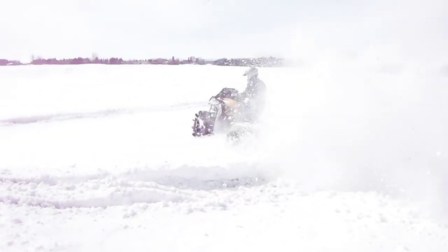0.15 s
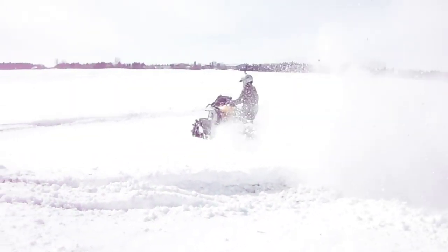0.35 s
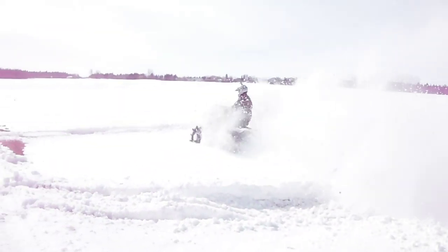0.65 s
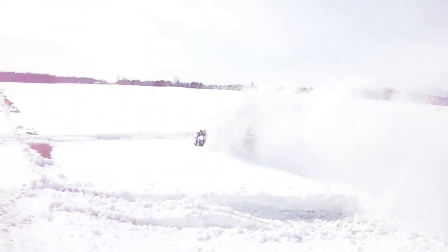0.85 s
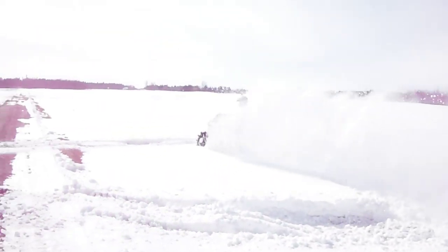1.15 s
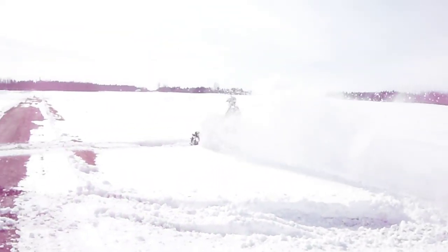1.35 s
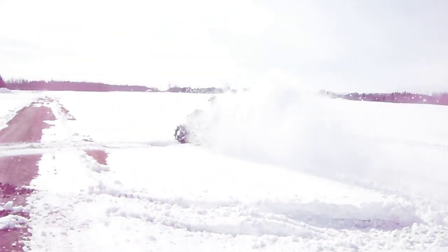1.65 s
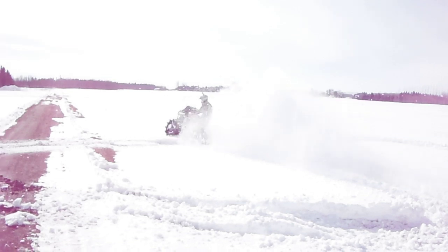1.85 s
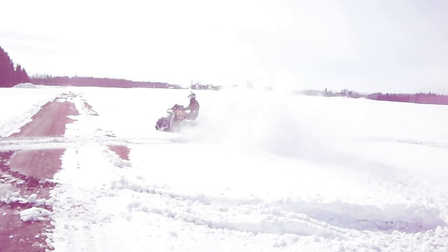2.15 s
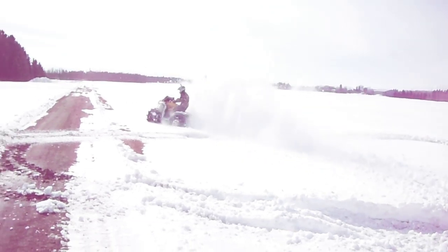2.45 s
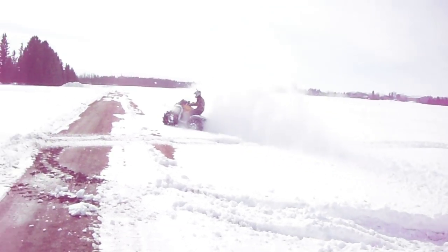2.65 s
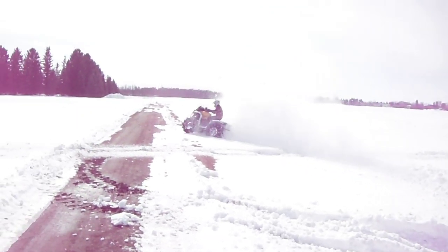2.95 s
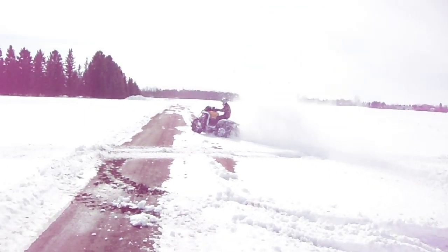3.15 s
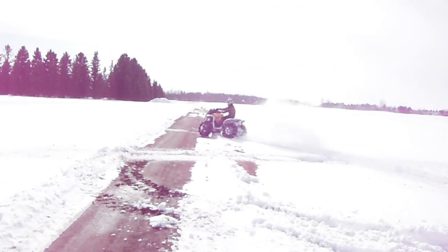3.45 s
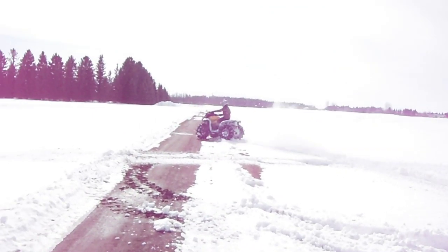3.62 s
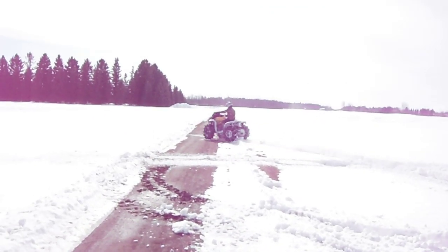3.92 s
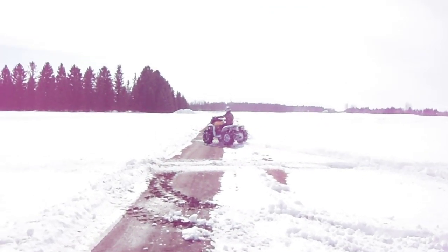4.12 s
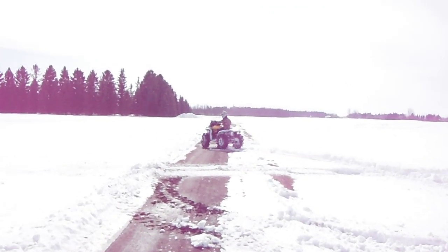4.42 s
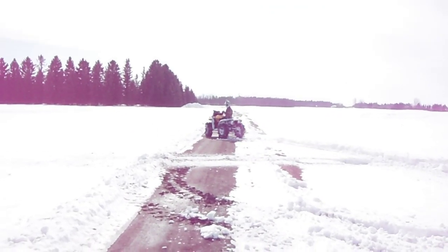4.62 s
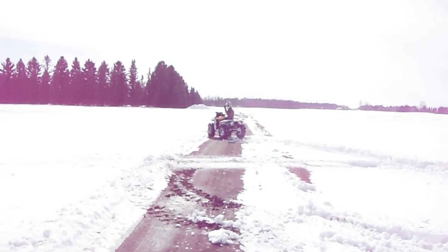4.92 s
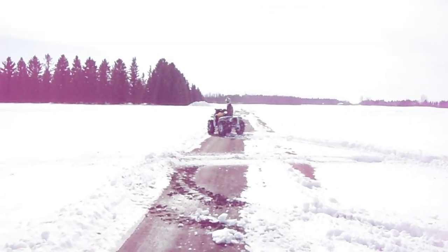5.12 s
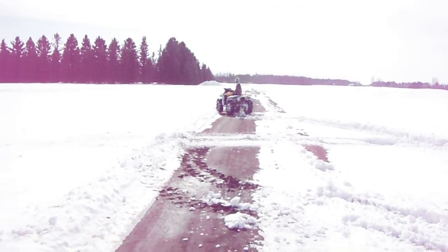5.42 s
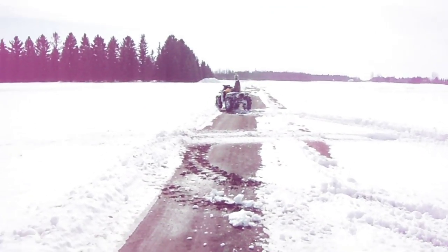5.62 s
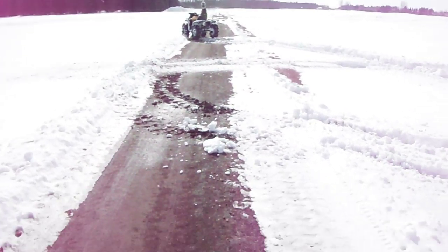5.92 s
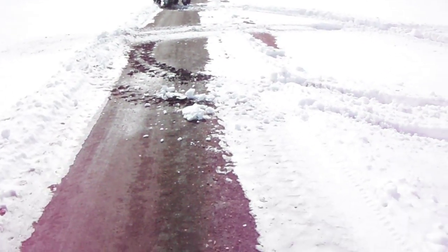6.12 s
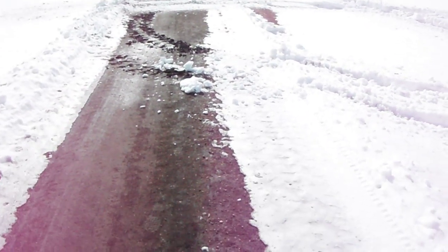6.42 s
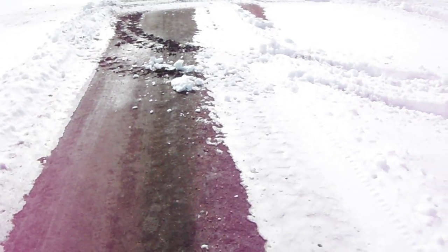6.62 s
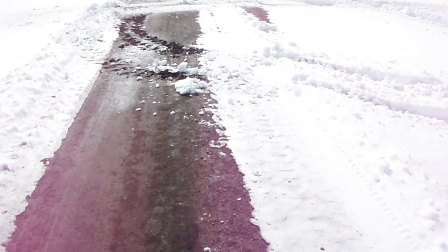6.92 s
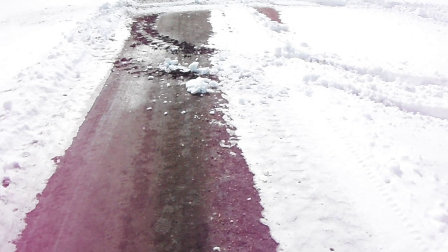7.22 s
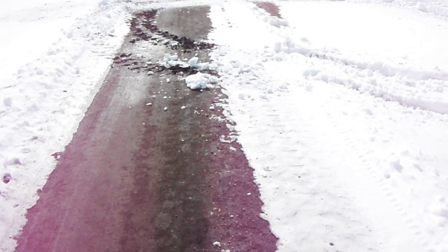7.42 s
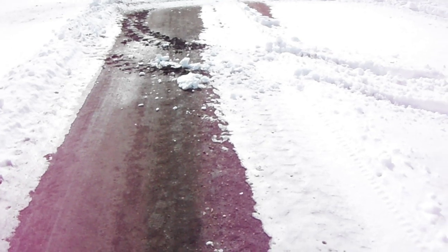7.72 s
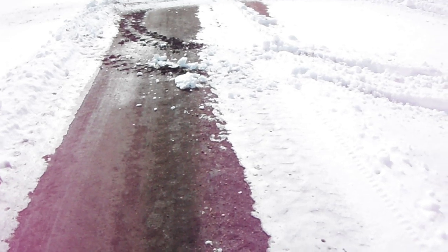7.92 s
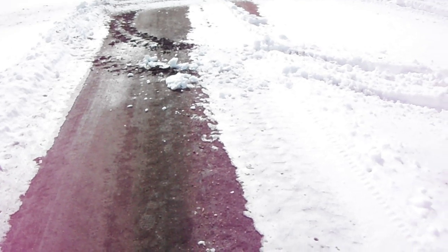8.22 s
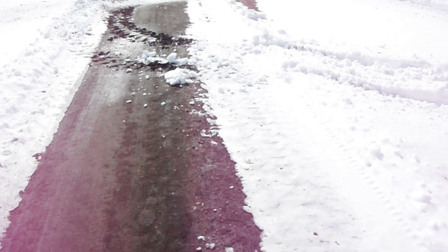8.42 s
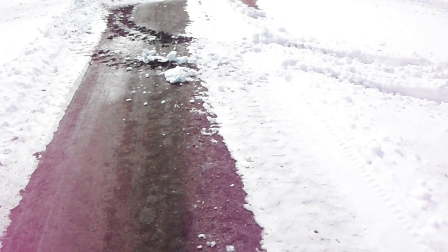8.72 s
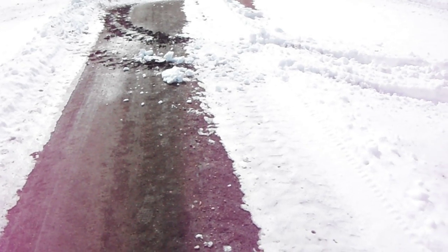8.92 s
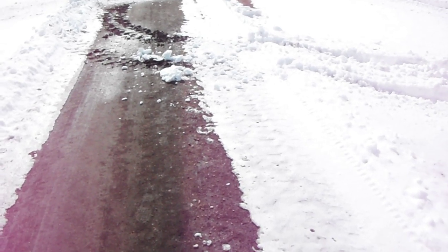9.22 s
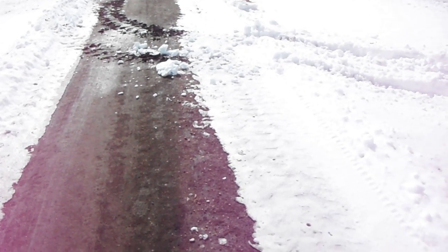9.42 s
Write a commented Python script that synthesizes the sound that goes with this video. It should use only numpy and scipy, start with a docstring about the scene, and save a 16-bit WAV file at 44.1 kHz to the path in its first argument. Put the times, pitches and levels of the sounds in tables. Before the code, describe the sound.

A quad bike revs hard through snow, then drops to a lumpy, popping idle while fingers rub and knock on the microphone.

```python
"""Out in deep snow, heard from a hand-held camera: a V-twin quad bike churns along at high revs,
shuts its throttle and draws near at a lumpy idle, with popping blips and stray cracks and thumps.
Each firing rings the exhaust and trails a rush of gas; the tyres crunch. Right at the microphone,
cloth rustles, fingers knock the case hard enough to overload, and the electronics whine thinly.
The camera's gain control ducks everything under the pull, blips and knocks, then swells back."""
import sys
import numpy as np
from scipy import signal
from scipy.fft import rfft, irfft, next_fast_len
from scipy.io import wavfile
from scipy.ndimage import uniform_filter1d, minimum_filter1d, map_coordinates

SR = 44100
rng = np.random.default_rng(int(sys.argv[2]) if len(sys.argv) > 2 else 0)


def digitize_waveform(pressure):
    """Quantize a signal to 16-bit integers and store it at the path in sys.argv[1].

    Rows of a 2-D input are taken as channels; values are limited to [-1, 1].
    """
    field = np.atleast_2d(pressure).T
    bounded = np.clip(field, -1, 1)
    quanta = np.round(bounded * 32767).astype(np.int16)
    wavfile.write(sys.argv[1], SR, quanta)


N = 421591
TIME = np.arange(N) / SR
THROTTLE_SHUT_S = 2.703
FIRING_PHASES = (.385, .748)  # front and rear cylinder, in engine cycles
FLYWHEEL_S, INTAKE_S = .191, .021  # how fast the revs and the mixture follow the throttle


def amp(db):
    """Decibels as an amplitude factor."""
    return 10 ** (np.asarray(db) / 20)


def unit_rms(x):
    """Scaled to rms 1."""
    return x / np.sqrt(np.mean(x ** 2) + 1e-20)


def curves(rows, at=TIME):
    """Each column after the time column, read at the given times."""
    s, *columns = np.transpose(rows)
    return [np.interp(at, s, c) for c in columns]


def add(mix, s, sound):
    """Mixes a sound in from time s."""
    part = mix[max(round(s * SR), 0):][:len(sound)]
    part += sound[:len(part)]


def noise(spectrum):
    """Noise of rms 1, coloured by (Hz, dB) points."""
    hz, db = np.transpose(spectrum)
    size = next_fast_len(N)
    gain = amp(np.interp(np.log(np.fft.rfftfreq(size, 1 / SR) + 1), np.log(hz), db))
    return unit_rms(irfft(rfft(rng.standard_normal(size)) * gain, size)[:N])


def ring(modes):
    """The response of dying modes to one blow; each falls 60 dB in its t60."""
    t = TIME[:SR // 4]
    return sum(amp(db) * amp(-60 * t / t60) * np.cos(2 * np.pi * hz * t) for hz, db, t60 in modes)


def through(x, response):
    """Convolution, cut to length."""
    return signal.oaconvolve(x, response)[:N]


def pulses(times, sizes):
    """An impulse at each time, shared between the neighbouring samples."""
    out = np.zeros(N + 2)
    at, part = np.divmod(np.clip(times * SR, 0, N), 1)
    np.add.at(out, at.astype(int), sizes * (1 - part))
    np.add.at(out, at.astype(int) + 1, sizes * part)
    return out[:N]


def puff(rise_s, decay_s):
    """Envelope of a short rush, peak 1."""
    t = TIME[:SR // 8]
    shape = (1 - np.exp(-t / rise_s)) * np.exp(-t / decay_s)
    return shape / shape.max()


def lag(x, seconds, start=0):
    """Follows x with a time constant."""
    keep = np.exp(-1 / (seconds * SR))
    return signal.lfilter([1 - keep], [1, -keep], x, zi=[keep * start])[0]


# Hiss, whine and wind at the microphone. Each row: frequency in Hz, relative level in dB.
HISS_SPECTRUM = [(3000, 20.4), (6200, 11.2), (7900, 19.8), (11000, 9.4), (13000, 4), (15800, 3)]
WHINE_TONES = [(7837, 0), (7897, 0), (7957, -10), (11719, -12)]
WIND_SPECTRUM = [(15, -15), (35, -43), (80, -2), (200, -4), (500, -26), (2000, -32)]
# Hiss and whine rise after the pull. Each row: time in seconds, gain in dB.
ELECTRONICS_GAIN = [(2.8, -7), (3.1, -1), (3.7, 3), (7.4, 3), (8.0, 2), (8.82, 4), (8.88, -1)]


def noise_floor(hiss_db=-46, whine_db=-46.5, wind_db=-52):
    """Behind everything: electronic hiss, a whine with sidebands and a little wind rumble."""
    whine = sum(amp(db) * np.sin(2 * np.pi * (hz * TIME + rng.random())) for hz, db in WHINE_TONES)
    electronics = amp(hiss_db) * noise(HISS_SPECTRUM) + amp(whine_db) * unit_rms(whine)
    return amp(curves(ELECTRONICS_GAIN)[0]) * electronics + amp(wind_db) * noise(WIND_SPECTRUM)


# Cloth on the camera. Each row: midpoint and length in seconds, scrape and swish gains in dB.
CLOTH_RUBS = [(5.494, 0.1, -93, -33.5), (5.575, 0.099, -42, -34.5), (5.648, 0.19, -26.5, -34.5),
              (5.818, 0.082, -36.5, -37.5), (5.98, 0.12, -39, -34), (6.417, 0.021, -39, -34),
              (6.573, 0.12, -22.5, -26), (6.903, 0.04, -19, -24), (6.972, 0.15, -20.5, -20.5),
              (7.238, 0.024, -18, -27)]
# Fingers on the camera. Each row: start in seconds, click and knock gains in dB.
FINGER_KNOCKS = [(5.952, -11, -43), (5.985, -15, -26), (6.008, -13.5, -25), (6.027, -13, -20.5),
                 (6.015, -9, -33), (6.158, -13, -26), (6.169, -0.5, -22), (6.531, -12, -42),
                 (6.538, 3, -10), (6.543, 3, -6), (6.558, 4, -27), (6.56, 0.5, -30), (6.884, -14, -13),
                 (6.908, -10, -0.5), (6.973, 10, 20.5), (6.975, 3, 4.5), (7.2013, -20, -5),
                 (7.2088, 3, 15.5)]
# The colours of cloth and fingers. Each row: frequency in Hz, relative level in dB.
SWISH_SPECTRUM = [(1500, -5), (4500, 2), (6000, -5), (8500, -1), (11500, -1.5), (13500, -29), (16000, -34)]
CLICK_SPECTRUM = [(1000, -39), (3000, -14), (4200, 10), (6000, -5), (8000, 9.5), (12000, 6.5), (15000, -24),
                  (16000, -22)]
# The case rings and the whole body shudders. Each row: frequency in Hz, gain in dB, t60 in seconds.
CAMERA_CASE_MODES = [(872, 0, .026), (1058, -5, .016), (1396, -1, .017), (1830, -3, .032), (2030, 0, .022),
                     (2610, 3, .005), (4470, -7, .003)]
CAMERA_BODY_MODES = [(32, -40, .16), (370, -34, .02)]


def handling(crack_db=-4, case_db=-3):
    """Right at the microphone, cloth brushes the camera; fingers click on it and knock its case."""
    scrape, swish = np.zeros((2, N))
    for s, length, scrape_db, swish_db in CLOTH_RUBS:
        stroke = np.hanning(int(length * SR))
        add(scrape, s - length / 2, amp(scrape_db) * stroke)
        add(swish, s - length / 2, amp(swish_db) * stroke)
    s, click_db, knock_db = np.transpose(FINGER_KNOCKS)
    blows = pulses(s, amp(knock_db))
    crack = amp(crack_db) * through(blows, puff(.00033, .0033))
    clicks = through(pulses(s, amp(click_db)), puff(.000092, .001)) * noise(CLICK_SPECTRUM)
    case = amp(case_db) * through(blows, ring(CAMERA_CASE_MODES) + ring(CAMERA_BODY_MODES))
    dull = noise([(60, 7.5), (400, 3), (900, -3), (1500, 1), (2300, -1), (3200, -8.5), (4700, -17),
                  (7000, -12), (14000, -99)])
    return (scrape + crack) * dull + swish * noise(SWISH_SPECTRUM) + clicks + case


# The quad steers onto the road. Each row: midpoint and length in seconds, pitch in Hz, level in dB.
GEAR_GROANS = [(4.871, 0.54, 594, -35.5), (5.044, .14, 295, -21.5), (5.214, .28, 280, -22),
               (5.419, 0.16, 282.4, -30.5)]


def groans(waver=.0238):
    """The running gear groans in short wavering tones that swell and fade."""
    out = np.zeros(N)
    drift = 1 + waver * unit_rms(lag(lag(rng.standard_normal(N), INTAKE_S), INTAKE_S))
    for s, length, hz, db in GEAR_GROANS:
        swell = np.hanning(int(length * SR))
        turns = np.cumsum(hz * drift[int(s * SR):][:len(swell)]) / SR
        add(out, s - length / 2, amp(db) * swell * np.sin(2 * np.pi * turns))
    return out


# Tyres and drive train, as they reach the microphone. Each row: time in seconds, gain in dB.
ROLLING_GAIN = [(2.74, -52), (2.93, -28.5), (3.3, -25), (4.5, -23), (5.7, -30.5), (6.2, -29.5),
                (9.56, -35.5)]
# Tyre crunch, and a rasp shared by ticks, cracks and gas. Each row: frequency in Hz, relative dB.
TYRE_SPECTRUM = [(180, 8.5), (300, 4.5), (325, -2), (510, -36), (599, -12), (1020, -34.5), (1340, -12.5),
                 (2350, -15.5), (3400, -28), (5250, -26), (6070, -44), (7360, -23), (8300, -24),
                 (14000, -52)]
RASP_SPECTRUM = [(150, 10), (400, 3.5), (700, 12), (1050, -3.5), (1500, 6), (2400, 7), (3100, 1.5),
                 (3800, -6.5), (5200, -7), (6200, -20), (8000, -13), (11500, -20), (13500, -90)]


def running_gear(ticks_per_s=220, tick_db=-7, tyres_db=1, churn_db=1):
    """Tyres crunch and churn the snow while the drive train ticks."""
    ticks = (rng.random(N) < ticks_per_s / SR) * np.minimum(rng.exponential(1, N), 3)
    clatter = amp(tick_db) * through(ticks, puff(.000058, .0017)) * noise(RASP_SPECTRUM)
    churn = noise([(30, -12), (70, 6), (150, 12), (280, -12), (400, -14), (700, -16), (1200, -22),
                   (4000, -59)])
    crunch = amp(tyres_db) * noise(TYRE_SPECTRUM)
    return amp(curves(ROLLING_GAIN)[0]) * (crunch + clatter + amp(churn_db) * churn)


# Stray beats as the quad draws near. Each row: start in seconds, crack and thump gains in dB.
EXTRA_THUMPS = [(3.33, -16, -32), (3.578, -34, -10.5), (3.686, -23, -9.5), (4.427, -18, -15),
                (4.775, -20, -11), (4.865, -18.5, -26), (5.244, -18, -4.5), (5.498, -20, -5)]


def extra_thumps():
    """Single sharp cracks and low thumps stand out from the engine's uneven putter."""
    s, crack_db, thump_db = np.transpose(EXTRA_THUMPS)
    cracks = through(pulses(s, amp(crack_db)), puff(.00025, .0029)) * noise(RASP_SPECTRUM)
    push = puff(.001, .00078)
    thump = signal.fftconvolve(push / push.sum(), ring([(117, -2.9, .2), (143, .2, .19)]))
    return cracks + through(pulses(s, amp(thump_db)), thump)


# Dabs of throttle. Each row: start and length in seconds, push in cycles per second above idle,
# extra rasp and extra thump in dB.
THROTTLE_BLIPS = [(2.703, .125, 8, -8, -4), (3.045, .065, 36, -14, -9), (3.11, .18, 16.1, -2, -2),
                  (3.481, .249, 8.2, -4, 0), (3.772, .186, 19.2, 3, 1), (4.061, .161, 6.9, -2, 0),
                  (4.222, .166, 29, -6, -1), (4.555, .376, 9.3, -3, 0), (4.939, .258, 5.1, -3, 0),
                  (8.786, .233, 22.1, -3, -2.5), (9.32, .115, 23.5, 2, 2)]


def throttle():
    """The rider's push, extra rasp and extra thump, held for the length of each blip."""
    held = np.zeros((3, N))
    for s, length, *controls in THROTTLE_BLIPS:
        held[:, round(s * SR):round((s + length) * SR)] = np.array(controls)[:, None]
    return held


# The full-throttle pull and the hunting idle. Each row: time in seconds, engine cycles per second.
PULL_REVS = [(0.0, 62.67), (0.067, 61.59), (0.233, 62.96), (0.479, 54.29), (0.786, 55.49), (0.798, 56.97),
             (1.104, 58.45), (1.111, 56.85), (1.41, 55.16), (1.613, 56.0), (1.764, 60.87), (1.817, 56.92),
             (1.888, 60.32), (2.151, 56.96), (2.277, 55.39), (2.698, 57.98), (2.703, 54.6)]
IDLE_REVS = [(5.3, 12.023), (5.55, 9.521), (5.75, 11.51), (5.9, 11.474), (6.5, 10.399), (7.1, 11.492),
             (7.4, 11.312), (7.6, 8.699), (7.8, 10.903), (7.95, 10.344), (8.5, 11.229), (8.7, 8.372),
             (9.2, 10.287)]
# The wheels grab and slip. Each row: time in seconds, surge depth in cycles per second.
SURGE_DEPTH = [(.2, .7), (2.6, .4)]


def crank(surge_hz=7.63, surge_peak_s=.022):
    """Engine cycles turned: revs surge under load, then the flywheel coasts towards idle plus push."""
    speed = curves(PULL_REVS)[0]
    coasting = TIME >= THROTTLE_SHUT_S
    target = curves(IDLE_REVS)[0] + throttle()[0]
    speed[coasting] = lag(target[coasting], FLYWHEEL_S, start=speed[-1])
    surge = curves(SURGE_DEPTH)[0] * np.cos(2 * np.pi * surge_hz * (TIME - surge_peak_s))
    return np.cumsum(speed + surge * ~coasting) / SR


def firings(cycles, drag_share=.063, drag_from_s=.0426):
    """The V angle spaces the firings unevenly; in slow cycles compression holds the rear piston back."""
    front, rear = [np.interp(np.arange(phase, cycles[-1], 1), cycles, TIME) for phase in FIRING_PHASES]
    return front, rear + drag_share * np.maximum(np.gradient(rear) - drag_from_s, 0)


# The engine casing. Each row: frequency in Hz, gain in dB, t60 in seconds.
ENGINE_CASING_MODES = [(1750, -10, 0.092), (2327, -2, 0.033), (2426, -3, 0.082), (2995, -11, 0.046),
                       (5370, -20, 0.054)]


def valves(cycles, valve_db=-44, scatter_db=3, per_cycle=4):
    """Valves snap shut and ring the casing, heard once the revs have fallen."""
    times = np.interp(np.arange(0, cycles[-1], 1 / per_cycle), cycles, TIME)
    times = times[times > THROTTLE_SHUT_S + FLYWHEEL_S]
    snaps = pulses(times, amp(valve_db + scatter_db * rng.standard_normal(len(times))))
    return through(snaps, ring(ENGINE_CASING_MODES))


# The exhaust drones as the revs sweep. Each row: time in seconds, third and fifth order gains in dB.
DRONE_GAINS = [(2.71, -29, -40), (2.8, -28, -35), (2.92, -17, -25), (3.05, -21, -34), (3.1, -21, -13),
               (3.27, -21, -14), (3.36, -25, -34), (3.74, -31, -34), (3.9, -25, -10), (4.01, -26, -15),
               (4.08, -31, -32), (4.22, -29, -23), (4.32, -20, -5), (4.44, -21, -7), (4.56, -31, -32),
               (4.9, -70, -70)]
# The growl above it. Each row: multiple of the cycle rate, gain in dB relative to the fifth.
GROWL_ORDERS = [(8, -12), (10, -13), (16, -23)]


def drone(cycles, drone_db=-1, fade_s=.018):
    """Uneven firing favours a few orders; they glide as clear tones as the engine coasts or picks up."""
    third, fifth = curves(DRONE_GAINS)
    orders = [(3, third), (5, fifth)] + [(order, fifth + db) for order, db in GROWL_ORDERS]
    tones = sum(amp(db) * np.cos(2 * np.pi * order * (cycles - phase)) / 2
                for order, db in orders for phase in FIRING_PHASES)
    return amp(drone_db) * np.clip((TIME - THROTTLE_SHUT_S) / fade_s, 0, 1) * tones


# The rear cylinder fails to catch. Each entry: time in seconds.
MISFIRE_TIMES = [4.605, 4.7, 4.792, 4.885, 5.535, 5.71, 5.89, 6.07, 6.425, 6.707, 6.8, 7.165, 7.52, 7.812,
                 7.905, 8.105, 8.57]


def without_misfires(times):
    """Drops the firing nearest each misfire."""
    return np.delete(times, [np.argmin(abs(times - s)) for s in MISFIRE_TIMES])


# The firings that pop hardest. Each row: time in seconds, extra thump and extra rasp in dB.
HARD_POPS = [(3.867, 3, 2.5), (4.274, 0.5, 1.5), (4.289, -4, 1.5), (4.312, 3, 3), (4.325, 11, 3.5),
             (8.008, 5, 8.5), (8.067, 4.5, 5.5), (8.352, 0.5, 5.5), (8.532, 2.5, 1.5), (8.849, 5, 2),
             (8.937, 4.5, 7), (9.02, 8.5, 3), (9.334, 3, 8), (9.375, 3, 7), (9.3942, 7, 5.5),
             (9.4226, 8.5, 12.5), (9.437, 6, 9.5)]


def popped(s, within_s=.009):
    """A firing close to a hard pop takes its time, thump and rasp; the others get nothing extra."""
    return next((row for row in HARD_POPS if abs(row[0] - s) < within_s), (s, 0, 0))


# The quad turns and nears the microphone. Each row: time in seconds, thump, rasp and burble gains in dB.
APPROACH_GAINS = [(2.8, -20.5, -24.5, -66), (3.15, -17, -28.5, -60), (3.6, -11.5, -35, -49),
                  (4.4, -3, -21.5, -22), (5.25, -12, -54, -26), (5.55, -7, -30.5, -29.5),
                  (6.4, 0.5, -23, -23), (7.4, -0.5, -30, -29.5), (7.9, -5.5, -29, -29.5),
                  (8.6, -3, -28, -29), (9.4, -5.5, -31.5, -25)]
# The muffler. Each row: frequency in Hz, relative level in dB, t60 in seconds.
MUFFLER_MODES = [(78.7, -9, .09), (128, 1.5, .095), (181.7, -2.3, .1), (237, -3.6, .064), (286, -1, .06)]


def light_throttle(front, rear, full_push=23.3, width_s=.0013, edge_s=.00027, lead_s=.008):
    """Soft blows ring muffler and casing; with effort they grow, narrow, suck more air and rasp more."""
    blows, gas_bursts, beats = np.zeros((3, N))
    push, bite_db, punch_db = [lag(control, INTAKE_S) for control in throttle()]
    t = TIME[:SR // 60] - lead_s
    for times in (front, without_misfires(rear)):
        times = times[times > THROTTLE_SHUT_S]
        for s, (thump_scatter, rasp_scatter) in zip(times, rng.standard_normal((len(times), 2))):
            s, pop_db, crack_db = popped(s)
            thump_db, rasp_db, burble_db = curves(APPROACH_GAINS, s)
            effort = np.interp(s, TIME, push) / full_push
            thump_db += np.interp(s, TIME, punch_db) + pop_db + 2 * effort - 2 * thump_scatter
            rasp_db += np.interp(s, TIME, bite_db) + crack_db + 14 * effort + 1.5 * rasp_scatter
            sigma = width_s * amp(-2 * effort)
            pressure = np.exp(-.5 * (t / sigma) ** 2)
            suck = (.21 + .23 * effort) * np.exp(-.5 * ((t + .0021) / sigma) ** 2)  # just before it
            edge = .19 * np.exp(-.5 * (t / edge_s) ** 2)  # the valve cracks open
            blow = (pressure - suck + edge) / (sigma * SR * np.sqrt(2 * np.pi))
            add(blows, s - lead_s, amp(thump_db) * blow)
            add(gas_bursts, s - .0015, amp([rasp_db]))
            add(beats, s, amp([burble_db + 13 * effort]))
    muffler = ring(MUFFLER_MODES)
    thump = amp(11.5) * through(blows, muffler / muffler[0])
    rasp = amp(-1) * through(gas_bursts, puff(.0001, .0073)) * noise(RASP_SPECTRUM)
    throat = noise([(150, -39), (240, 15.5), (310, 10), (370, 1), (460, 5.5), (560, -31), (680, -7),
                    (900, -71)])
    burble = through(beats, puff(.00051, .013)) * throat
    casing = amp(-7) * through(gas_bursts, ring(ENGINE_CASING_MODES))
    return thump + rasp + burble + casing


def snow_echo(x, share=.42):
    """A glancing bounce off the snow combs the treble; the notches slide down as the quad comes round."""
    delay_s = .00137 + .00004 * TIME
    treble = signal.sosfiltfilt(signal.butter(2, 3500, "high", fs=SR, output="sos"), x)
    return x + share * map_coordinates(treble, [(TIME - delay_s) * SR], order=3)


# The pull, heard from a distance. Each row: time in seconds, relative bark level in dB.
PULL_GAIN = [(0.0, -30), (.3, -31), (.47, -33.5), (0.6, -35.5), (.7, -32.5), (0.9, -28), (1.07, -30),
             (1.15, -33), (1.33, -36), (1.5, -31), (1.7, -27.5), (1.85, -31), (2.3, -31.5), (2.42, -29.5),
             (2.64, -29), (2.7, -36.5)]
# The open exhaust. Each row: frequency in Hz, gain in dB, t60 in seconds.
BARK_MODES = [(69, -29, 0.081), (216, -32, 0.025), (500, -29, 0.015), (693, -16, 0.015),
              (1412, -17.5, 0.018), (1885, -32.5, 0.018), (1665, -8.5, 0.0056), (2250, -12.5, 0.01),
              (2780, -26, 0.02), (7600, -30.5, 0.045), (10200, -26, 0.0046)]


def exhaust_shocks(times, edge_hz, gain_db=44.5, bass_db=21.5, scatter_db=.3):
    """One cylinder's shocks and the bark they ring: load sharpens it, while the bass stays steady."""
    times = times[times < THROTTLE_SHUT_S]
    t = TIME[:SR // 100]
    edge = t * np.exp(-2 * np.pi * edge_hz * t)
    bark = -signal.fftconvolve(edge / edge.sum(), ring(BARK_MODES))
    shock_db = curves(PULL_GAIN, times)[0] + gain_db + scatter_db * rng.standard_normal(len(times))
    shocks = pulses(times, amp(shock_db))
    steady = pulses(times, amp(bass_db))
    bass = signal.sosfiltfilt(signal.butter(2, 400, fs=SR, output="sos"), steady - shocks)
    return shocks, through(shocks + bass, bark)


# Two hollow bands in the engine's bark, as heard across the snow.
# Each row: frequency in Hz, sharpness as Q, share removed.
BARK_NOTCHES = [(1017, 21, 0.5), (4630, 5.4, 0.47)]


def full_throttle(front, rear, front_db=-9, gas_db=-21.5):
    """Each cycle a weak and a strong shock ring the exhaust, each trailed by turbulent gas."""
    weak, weak_bark = exhaust_shocks(front, edge_hz=2600)
    strong, strong_bark = exhaust_shocks(rear, edge_hz=3600)
    gas = through(strong, puff(.00051, .0022)) + .43 * through(weak, puff(.0004, .0043))
    jet = noise([(400, -14), (700, -2), (1000, -4), (1400, 2), (2900, 3), (3400, -6), (5300, -9),
                 (6200, -22), (7900, -15.5), (9500, -24.5), (12000, -23), (14000, -45)])
    bark = snow_echo(strong_bark + amp(front_db) * weak_bark + amp(gas_db) * gas * jet)
    for hz, q, share in BARK_NOTCHES:
        bark -= share * signal.lfilter(*signal.iirpeak(hz, q, fs=SR), bark)
    # The top of the treble does not survive the distance to the microphone.
    return signal.sosfilt(signal.butter(10, 12000, fs=SR, output="sos"), bark)


def scene():
    """The quad out in the snow and the camera's own sounds, at one microphone."""
    cycles = crank()
    front, rear = firings(cycles)
    engine = full_throttle(front, rear) + light_throttle(front, rear) + drone(cycles) + valves(cycles)
    return (engine + running_gear() + groans() + extra_thumps() + handling() + noise_floor())[None]


def gain_control(x, threshold_db=-5, deepest_db=19, treble_db=17,
                 attack_s=.03, hold_s=.02, recovery_s=.52, block=44):
    """Peaks, above all bright ones, are held and duck the gain; it creeps back. It starts out ducked."""
    treble = signal.sosfilt(signal.butter(2, 1500, "high", fs=SR, output="sos"), x)
    power = uniform_filter1d((x + amp(treble_db) * treble) ** 2, block)[::block]
    level_db = 10 * np.log10(np.abs(power) + 1e-12)
    step_s = block / SR
    half_hold = round(hold_s / step_s / 2)
    held_db = -minimum_filter1d(-level_db, 2 * half_hold + 1, origin=half_hold)
    cut_db, cuts = deepest_db, []
    for wanted_db in np.clip(held_db - threshold_db, 0, deepest_db):
        cut_db += max(wanted_db - cut_db, 0) * step_s / attack_s - cut_db * step_s / recovery_s
        cuts.append(cut_db)
    return x * amp(-np.interp(TIME, TIME[::block], cuts))


def record(dry):
    """Inside the camera: gain control, overload on the hardest knocks, then the band limit."""
    overloaded = np.clip(gain_control(dry[0]), -1, 1)
    band_limit = signal.firwin(511, 16100, window=("kaiser", 9), fs=SR)
    return signal.oaconvolve(overloaded, band_limit, "same")[None]


dry = scene()
out = record(dry)
digitize_waveform(out)
```